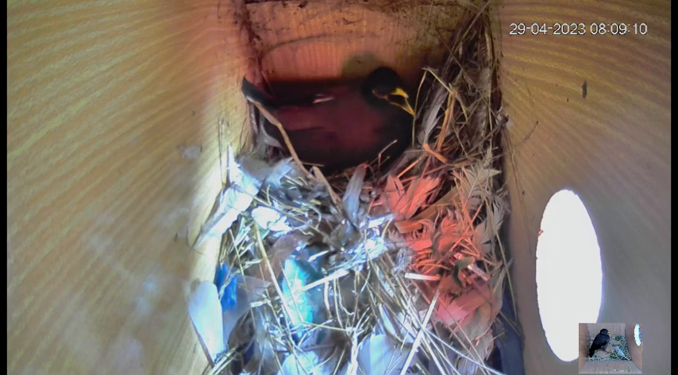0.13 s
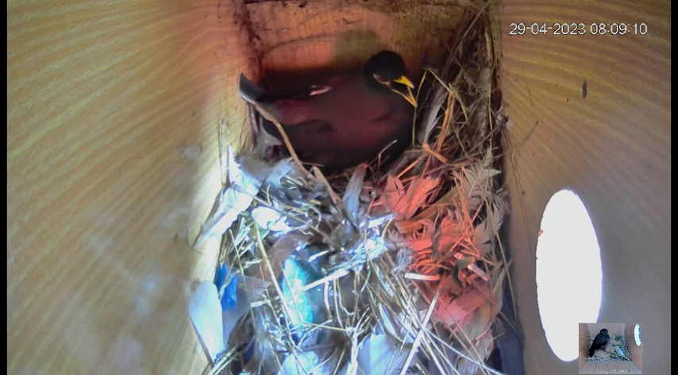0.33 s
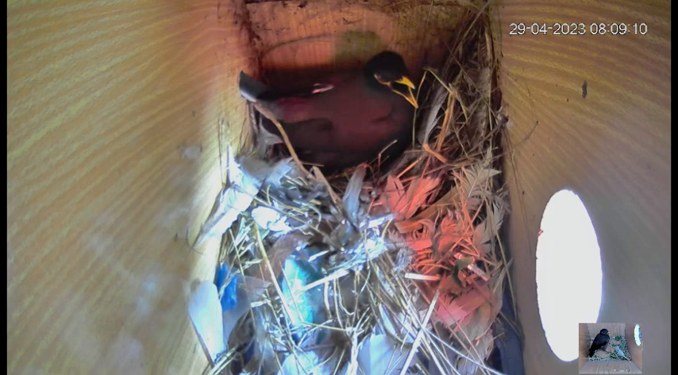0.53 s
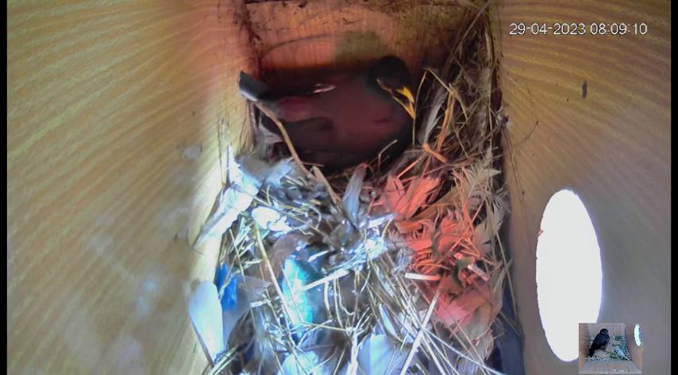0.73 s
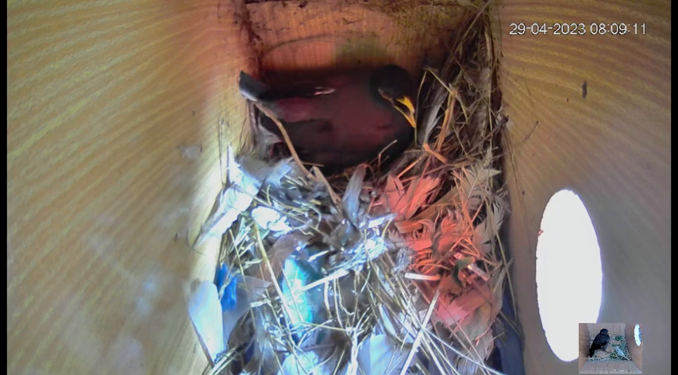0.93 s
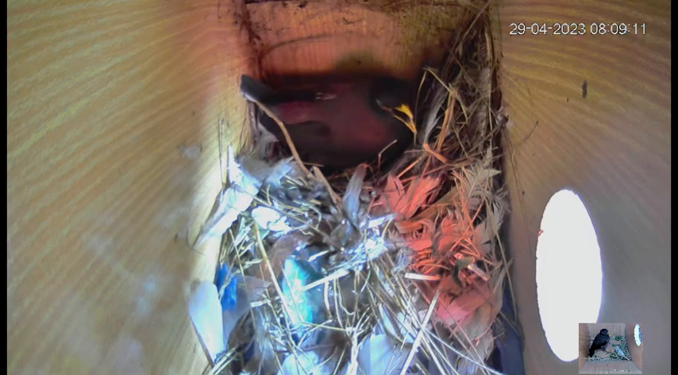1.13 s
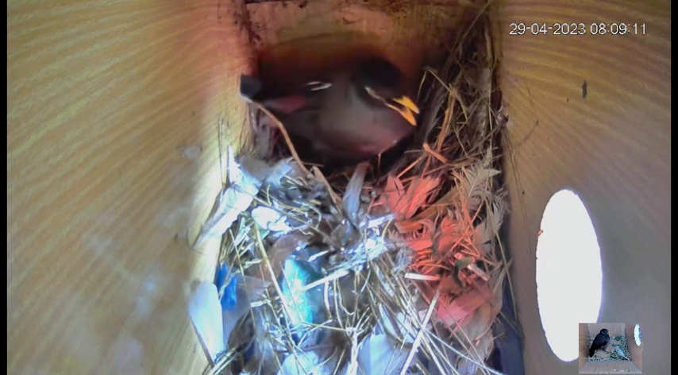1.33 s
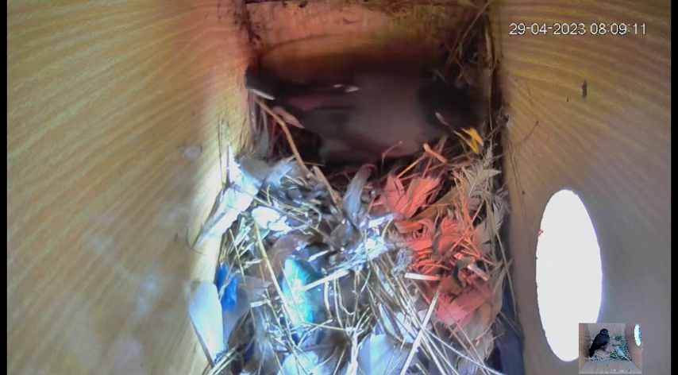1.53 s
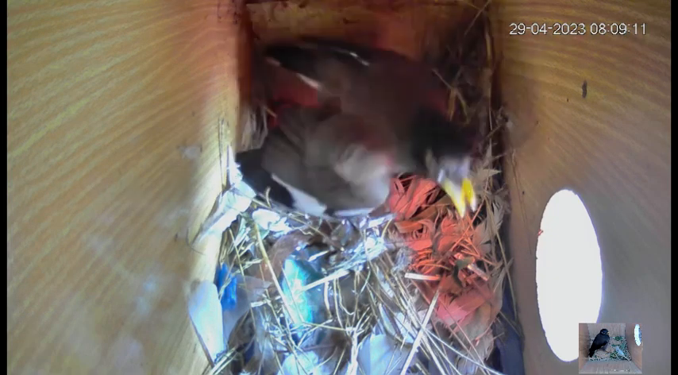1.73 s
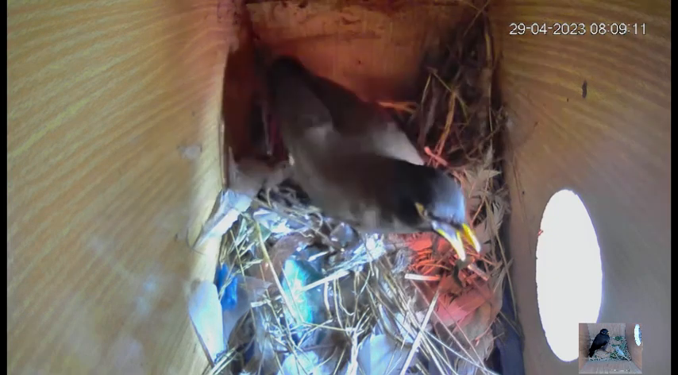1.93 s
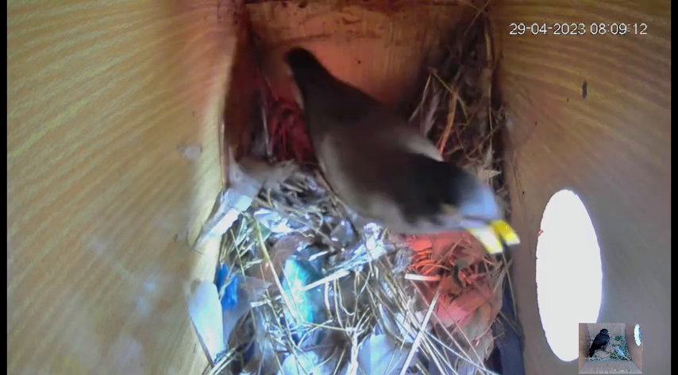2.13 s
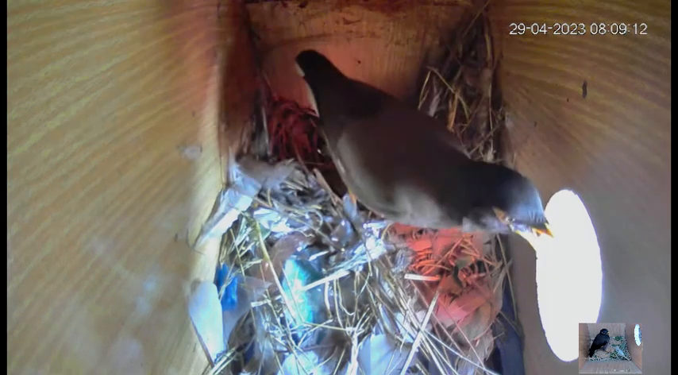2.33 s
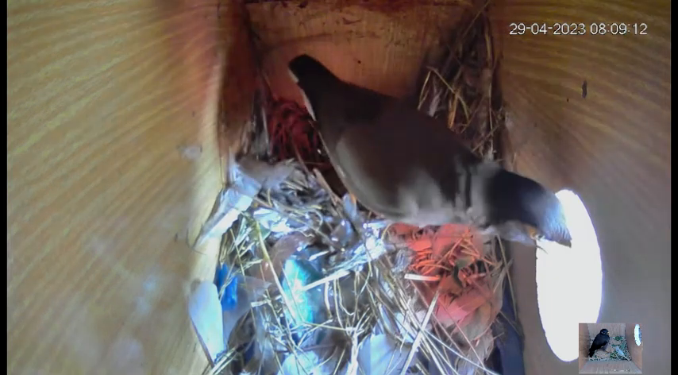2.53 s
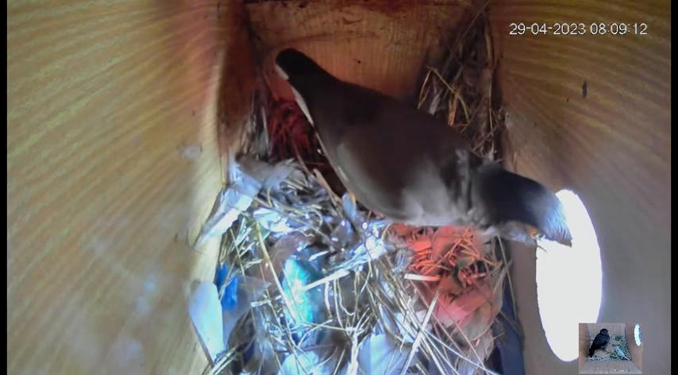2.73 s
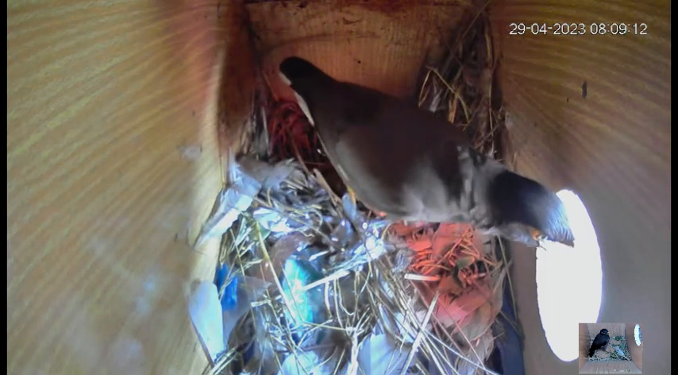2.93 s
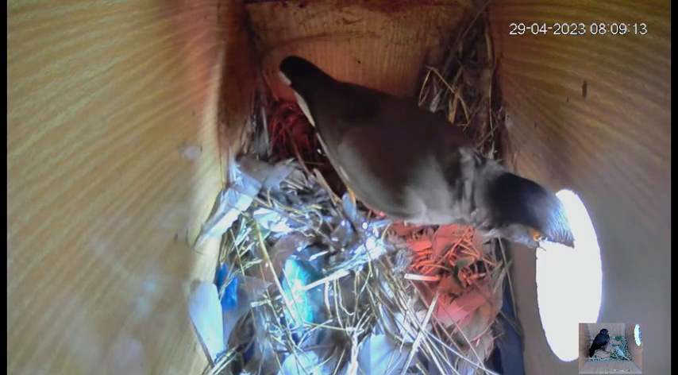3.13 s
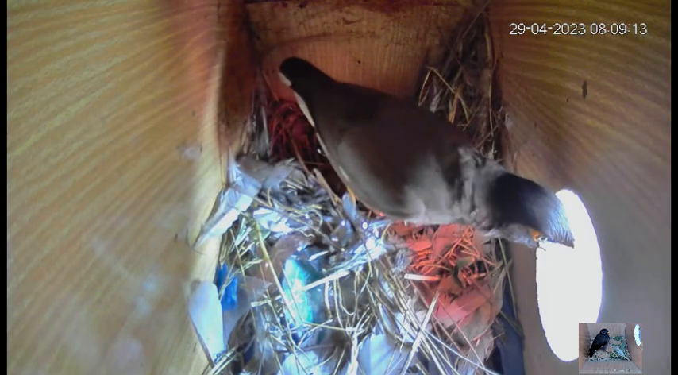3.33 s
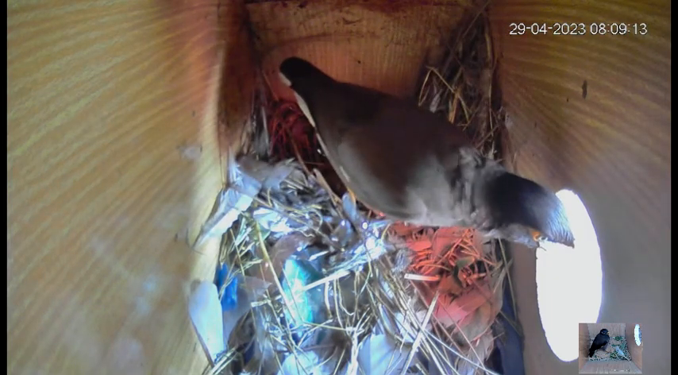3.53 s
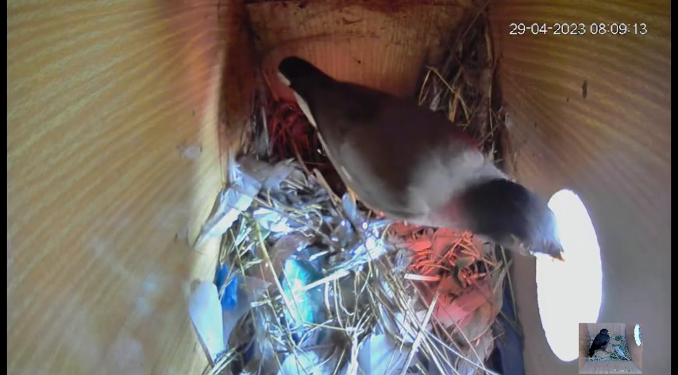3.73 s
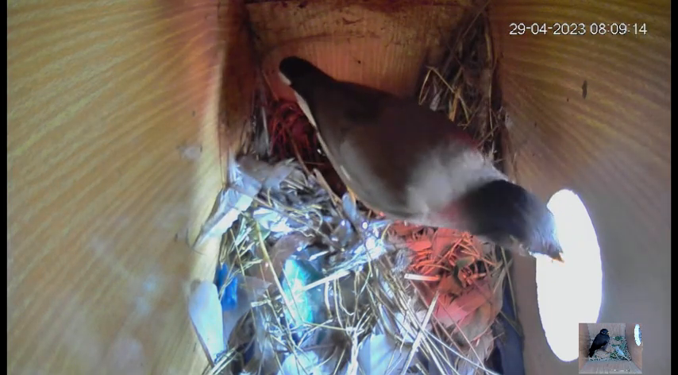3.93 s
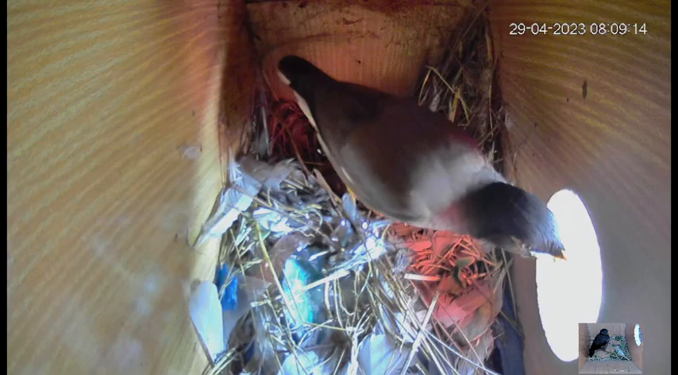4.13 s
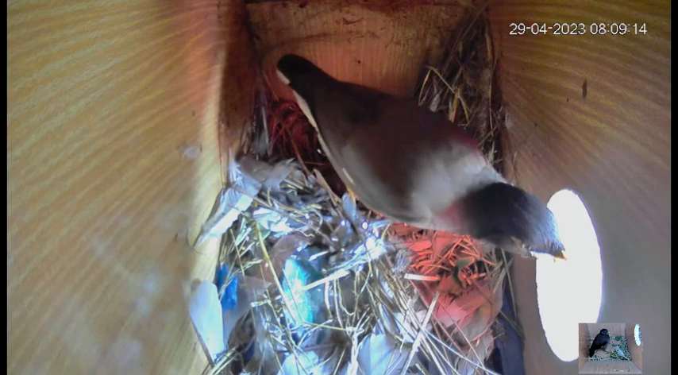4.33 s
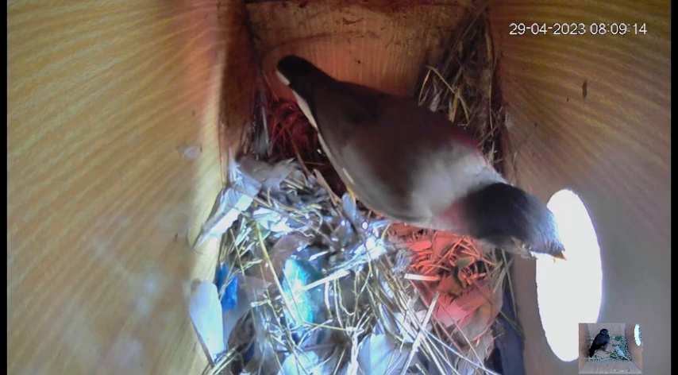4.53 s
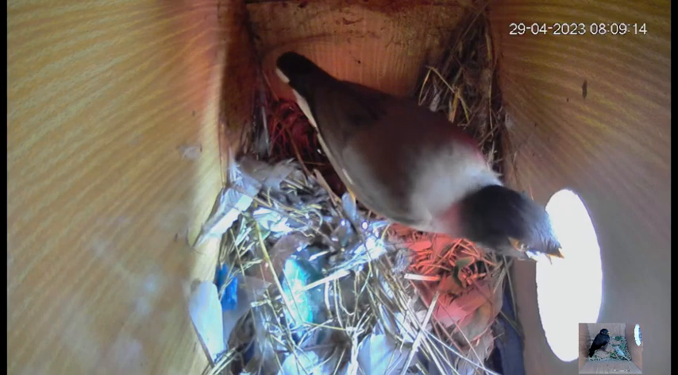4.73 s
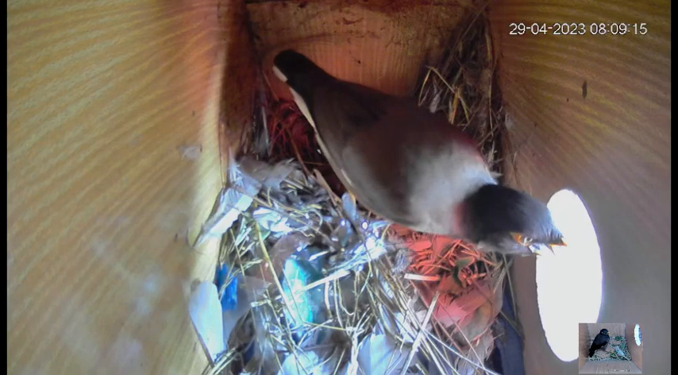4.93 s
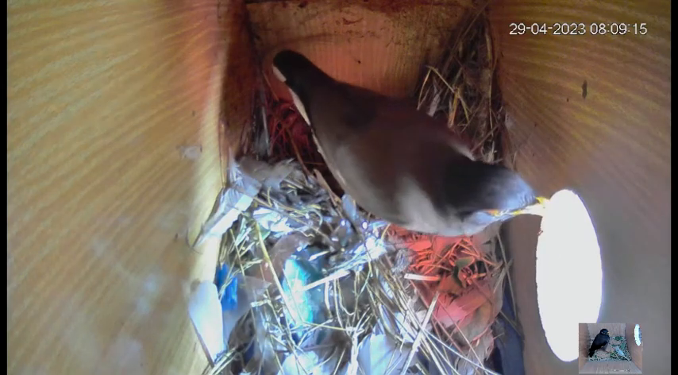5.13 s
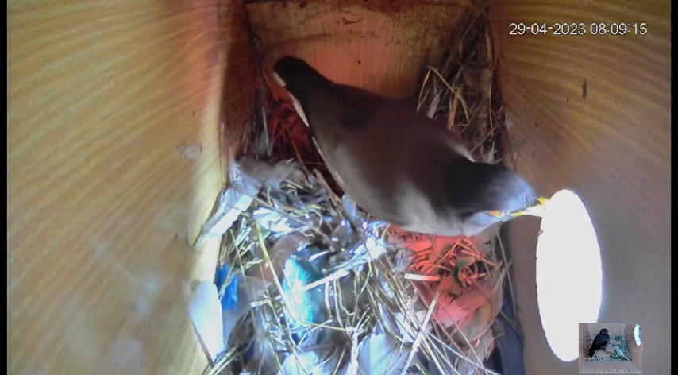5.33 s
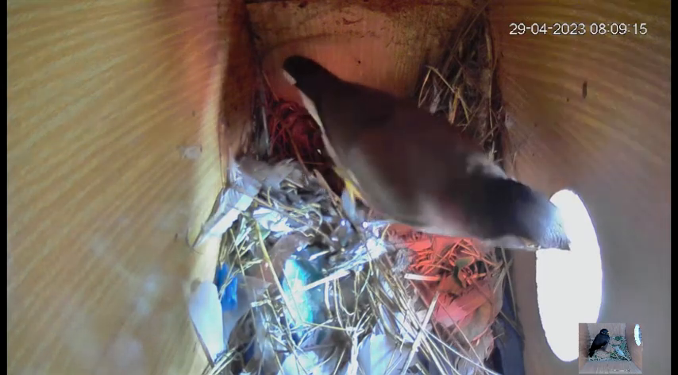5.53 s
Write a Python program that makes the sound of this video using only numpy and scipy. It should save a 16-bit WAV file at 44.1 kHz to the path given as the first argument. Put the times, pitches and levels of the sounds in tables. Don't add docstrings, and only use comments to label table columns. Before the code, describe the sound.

A bird in a wooden nest box ticks quietly, then scrambles through dry grass with sharp snaps, thumps and booms, before settling to near silence.

```python
import sys
import numpy as np
from scipy import signal
from scipy.fft import rfft, irfft
from scipy.io import wavfile
from scipy.ndimage import uniform_filter1d

SR = 44100
rng = np.random.default_rng(int(sys.argv[2]) if len(sys.argv) > 2 else 0)


def master_out(mix):
    frames = np.transpose(np.atleast_2d(mix))
    ceiling = np.clip(frames, -1, 1)
    pcm = np.round(ceiling * 32767).astype(np.int16)
    wavfile.write(sys.argv[1], SR, pcm)


def gain_from_db(level_db):
    decades = np.asarray(level_db, float) / 20
    return 10 ** decades


N = 250047


def evened(x):
    return x / np.sqrt(np.mean(x ** 2) + 1e-20)


def columns(rows, t):
    s, *rest = np.transpose(rows)
    return [np.interp(t, s, c) for c in rest]


def colour(x, points):
    f, db = np.transpose(points)
    hz = np.fft.rfftfreq(len(x), 1 / SR)
    gain = gain_from_db(np.interp(np.log(hz + 1), np.log(f + 1), db))
    return irfft(rfft(x) * gain, len(x))


def resonate(x, hz, width_hz):
    turn = np.exp(2j * np.pi * np.cumsum(hz * np.ones(len(x))) / SR)
    decay = np.exp(-np.pi * width_hz / SR)
    smooth = signal.lfilter([1 - decay], [1, -decay], x / turn + 1e-18)
    return 2 * (turn * smooth).real


def modes(x, table):
    return sum((-1) ** k * gain_from_db(db) * resonate(x, hz, width_hz)
               for k, (hz, width_hz, db) in enumerate(table))


def add(mix, s, sound):
    part = mix[round(s * SR):][:len(sound)]
    part += sound[:len(part)]


def steady(x, seconds, share):
    power = uniform_filter1d(x ** 2, round(seconds * SR)) + 1e-12
    return evened(x / power ** (share / 2))


def swells(s, db, fade_s, calm_db, rise=0.68):
    t = np.arange(0, N / SR + .01, .002)[:, None]
    late = (t - s) / np.maximum(fade_s, .02)
    swell = gain_from_db(db - 20 * np.maximum(late, -late / rise))
    power = (swell ** 2).sum(1) + gain_from_db(calm_db) ** 2
    return np.interp(np.arange(N) / SR, t[:, 0], np.sqrt(power))


def patchy(x, patch_db, flicker_db):
    z = signal.stft(x, nperseg=512, noverlap=384)[2]
    chance = rng.standard_normal(z.shape)
    patches = evened(uniform_filter1d(uniform_filter1d(chance, size=5, axis=0), size=12, axis=1))
    flicker = evened(uniform_filter1d(chance[0], size=5))
    z = z * gain_from_db(patch_db * patches + flicker_db * flicker)
    return evened(signal.istft(z, nperseg=512, noverlap=384)[1][:N])


# frequency in Hz, level in dB per Hz.
GRASS_SPECTRUM = [(530, -38), (900, -29), (1060, -11.5), (1350, -15), (1730, -5), (2240, -5.5),
                  (3510, -3.5), (4320, -1), (5350, -13.5), (6040, -8.5), (7050, -20.5), (9160, -48.5),
                  (15500, -120)]
# frequency in Hz, width in Hz, level in dB.
BOX_MODES = [(1375, 59, -5), (2170, 30, 1), (2430, 61, -7.5), (2880, 40, -12.5), (2930, 100, -3.5),
             (3606, 16, 3), (4170, 25, 4), (4510, 52, -0.5), (4700, 37, 3), (5650, 12, -4), (5240, 36, -4)]


def box(x, ring_db=-3.0):
    grass = evened(colour(x, GRASS_SPECTRUM))
    return evened(grass + gain_from_db(ring_db) * evened(modes(x, BOX_MODES)))


# frequency in Hz, width in Hz, level in dB.
WALL_MODES = [(477, 42, -1), (747.1, 48, 4.5), (981, 75, -7.5), (542, 300, -24)]


def walls(x):
    return modes(x, WALL_MODES)


# peak in seconds, stem crackle in dB,
# time to fade 20 dB in seconds, wall modes over crackle in dB.
MOVES = [(0.404, -58.5, 0.26, 8.5), (0.74, -88, 0, 32.5), (1.422, -75.5, 0.1, 17), (1.54, -61, 0.33, -16.5),
         (1.612, -49, 0.2755, 6.5), (1.683, -50, 0.2574, 13.5), (1.742, -33.5, 0.08, 10),
         (1.76, -40, 0.0432, 1), (1.815, -33, 0.0484, 4), (1.845, -36, 0.0611, 5.5),
         (1.868, -33.5, 0.0675, 4.5), (1.891, -33.5, 0.0562, 2), (1.922, -40, 0.0574, 10.5),
         (1.97, -29, 0.05, 5.5), (1.99, -46, 0.0854, -4), (2.029, -39, 0.08, -6), (2.059, -36, 0.0524, 5.5),
         (2.095, -33, 0.0508, 11.5), (2.165, -48.5, 0.1271, 5), (2.241, -79, 0.16, -21),
         (2.304, -49.5, 0.0777, 7), (2.361, -54.5, 0.19, -1), (2.39, -54.5, 0.15, 4.5),
         (2.419, -50.5, 0.0834, 6.5), (2.492, -59.5, -0.03, 16.5), (2.538, -63, -0.0443, 14.5),
         (2.701, -75, 1.45, 8.5), (2.802, -62.5, 0.15, 12.5), (2.859, -59, -0.1, 9), (3.251, -81, -1, -2),
         (3.52, -88, 0.5, 19.5), (5.348, -71, 0.06, 11), (5.479, -78.5, 0.63, -7.5), (5.67, -82, -1.8, 21)]


def rustle():
    rest_db, rest_walls_db = -86.5, 11
    slips_per_s, scrape_s = 700, 0.005
    s, crackle_db, fade_s, walls_db = np.transpose(MOVES)
    clumps = evened(uniform_filter1d(uniform_filter1d(rng.standard_normal(N), 500), 500))
    sizes = gain_from_db(6.1 * np.minimum(rng.exponential(1, N), 5))
    slips = sizes * (rng.random(N) < slips_per_s / SR)
    scrape = signal.lfilter([1], [1, -np.exp(-1 / (scrape_s * SR))], slips ** 2) ** .5
    drive = (evened(scrape) + 0.21) * gain_from_db(0.8 * clumps) * rng.standard_normal(N)
    panels = steady(modes(walls(drive), [(597.6, 1800, 0)]), 0.37, 0.46)
    stems = steady(patchy(box(drive), patch_db=5., flicker_db=1.), .018, .6)
    stem_gain = gain_from_db(2.0) * swells(s, crackle_db, fade_s, rest_db)
    wall_gain = gain_from_db(-15.5) * swells(s, crackle_db + walls_db, fade_s, rest_db + rest_walls_db)
    return stem_gain * stems + wall_gain * panels


# time in seconds, knock against each break in dB.
BEARING = [(0.3, -16), (0.41, -23.5), (0.9, -41.5), (1.1, -7.5), (1.39, -25.5), (1.48, -52.5), (1.6, -18),
           (1.73, -25.5), (1.86, -19), (2.29, -17), (2.44, -28), (2.6, -14.5), (2.78, -29.5), (3.3, -15.5),
           (3.65, -39.5), (5.3, -27), (5.65, -14)]


def breaks(table, press_db, ring_db, rise_s, crack_s, tail, tick, box_db, low_cut_db=0., width_hz=900):
    out, t = np.zeros(N), np.arange(-600, 4200) / SR
    age = np.maximum(t, 0)
    for s, db, hz, t60 in table:
        noise = rng.standard_normal((2, len(t)))
        crack = np.exp(-age / crack_s) + tail * gain_from_db(-60 * age / np.clip(t60, .01, .2))
        crack *= np.clip(1 + t / rise_s, 0, 1) ** 2
        burst = noise[0] * crack + tick * (t == 0)
        ring = evened(resonate(resonate(burst, hz, width_hz), hz, 1.45 * width_hz))
        stem = colour(box(burst, box_db), [(800, -low_cut_db), (3200, 0.002)]) + gain_from_db(ring_db) * ring
        knock = walls(noise[1] * crack)
        knock_gain = gain_from_db(columns(BEARING, s)[0] + press_db + 0.5)
        sound = stem / abs(stem).max() + knock_gain * knock / abs(knock).max()
        sound *= np.clip((t + rise_s + .002) / .002, 0, 1) * np.clip((t[-1] - t) / .03, 0, 1)
        add(out, s + t[0] + rise_s / 2, gain_from_db(db) * sound)
    return out


# time in seconds, peak in dB, stem
# pitch in Hz, t60 in seconds.
SNAPS = [(0.2897, -43.5, 4370, 0.29), (0.3425, -43.5, 3970, 0.28), (0.393, -42, 4140, 0.041),
         (0.407, -40, 3990, 0.058), (0.463, -40, 4320, 0.13), (0.8959, -44.5, 4070, 0.057),
         (1.3728, -36, 4620, 0.16), (1.3861, -33, 3140, 0.23), (1.451, -27, 4260, 0.09),
         (1.474, -16.5, 4400, 0.048), (1.5147, -21, 4170, 0.039), (1.5948, -44, 4300, 0.067),
         (1.7154, -24.5, 3210, 0.048), (1.7245, -17, 4280, 0.055), (1.7546, -19, 2200, 0.12),
         (1.7694, -26, 3910, 0.029), (1.8362, -9, 4300, 0.12), (1.8397, -8.5, 4417, 0.013),
         (1.8557, -20, 2400, 0.04), (2.1683, -23.5, 5600, 0.026), (2.2867, -35.5, 5230, 0.16),
         (2.4805, -33, 5910, 0.03), (2.5264, -37, 4560, 0.11), (2.7736, -24, 4340, 0.044),
         (5.2702, -52, 2897, 0.058), (5.3233, -43, 5970, 0.057),
         (5.16, -64, 5570, 0.059),
    (5.1862, -57.5, 4970, 0.042),
    (5.415, -54.5, 5650, 0.058),
         (0.476, -47.5, 4140, 0.033), (1.3665, -44.5, 4760, 0.041), (1.4385, -41, 4620, 0.046),
             (1.4792, -27.5, 4420, 0.029), (1.493, -38, 4230, 0.052), (1.5199, -30.5, 4130, 0.031),
             (1.5428, -39.5, 3400, .04), (1.789, -30.5, 4000, 0.066), (1.8164, -24.5, 4530, 0.025),
             (1.846, -15.5, 4040, 0.056), (1.8875, -23, 4048, .05), (1.923, -28.5, 4220, .03),
             (2.0251, -27.5, 4130, 0.19), (2.109, -35, 4330, 0.049), (2.194, -38, 4070, 0.022),
             (2.406, -37.5, 4080, 0.063), (2.436, -40.5, 6120, 0.022), (2.45, -36, 4320, 0.032),
             (2.548, -45, 4650, 0.045), (2.7781, -27, 4360, .04), (5.0967, -63, 5060, 0.041),
             (5.661, -51.5, 3770, 0.044), (5.6645, -44, 3840, 0.034)]
CRUNCHES = [
    (1.6045, -25, 3960, 0.041),
    (1.6871, -26, 3780, 0.054),
    (1.689, -28.5, 2330, 0.08),
    (1.8375, -19, 3086, 0.09),
    (1.8365, -22.5, 5882, 0.026),
    (1.9665, -21, 4460, 0.033),
    (2.1655, -23, 4010, 0.059),
    (5.3068, -46, 4140, 0.088),
    (5.6485, -36.5, 3700, 0.034),
    (5.6485, -44.5, 5920, 0.034),
]
TAPS = [
    (2.207, -40.5, 3950, 0.067),
    (2.528, -47, 3020, .04),
    (2.548, -54, 6700, 0.036),
    (3.6465, -37, 4400, .05),
    (3.648, -49.5, 3410, 0.04),
    (3.6625, -55.5, 4550, 0.034),
    (5.272, -51, 2858, .08),
    (5.309, -52.5, 2950, 0.12),
]
SCUFFS = [(0.1875, -52, 4290, 0.25), (0.5316, -47.5, 3960, 0.2), (1.0294, -61, 4230, 0.046),
          (1.1094, -61, 2700, 0.15), (1.3944, -29, 4400, 0.29), (1.417, -32.5, 3980, 0.14),
          (1.5718, -49, 3900, 0.073), (1.6472, -33, 4180, 0.12), (1.7, -28.5, 3830, 0.067),
          (1.7995, -19.5, 4030, 0.11), (1.8905, -29, 4170, 0.071), (1.9545, -22, 4500, 0.13),
          (2.056, -25, 4040, 0.063), (2.088, -30.5, 4220, 0.053), (2.149, -34.5, 4400, 0.041),
          (2.2062, -42, 4130, 0.048), (2.2252, -45.5, 4800, 0.1), (2.3144, -50, 4700, 0.24),
          (2.368, -40, 3960, 0.25), (2.296, -41, 4550, .15), (2.392, -37, 4000, .15),
          (2.4364, -32.5, 3000, 0.042), (2.559, -50, 3890, 0.038), (2.8057, -42, 4110, 0.21),
          (2.8492, -38, 4850, 0.19), (2.9767, -53, 2210, 0.11), (3.1659, -56, 4634, 0.085),
          (3.258, -59.5, 2170, 0.13), (4.076, -61, 4230, 0.073), (4.615, -57, 4130, .08),
          (5.3073, -42, 2910, 0.23), (5.35, -49.5, 796, 0.055)]


def snaps():
    sharp = breaks(SNAPS, press_db=0, ring_db=8, rise_s=.001, crack_s=.0014,
                   tail=.33, tick=3., box_db=-2., low_cut_db=14.)
    crunch = breaks(CRUNCHES, press_db=0, ring_db=8, rise_s=.002, crack_s=.003,
                    tail=.5, tick=.3, box_db=0., low_cut_db=10.)
    taps = breaks(TAPS, press_db=0, ring_db=12.5, rise_s=.002, crack_s=.002,
                  tail=.4, tick=1., box_db=0., width_hz=290)
    scuffs = breaks(SCUFFS, press_db=6.5, ring_db=1.5, rise_s=.012, crack_s=.005,
                    tail=.8, tick=.1, box_db=1.)
    return taps + sharp + crunch + gain_from_db(-4) * scuffs


# time in seconds, thump in dB.
THUMPS = [(0.672, -59), (1.499, -57.5), (1.751, -47.5), (1.832, -43), (1.879, -45.5), (2.0, -43.5),
          (2.077, -48), (2.16, -57), (2.191, -52.5), (2.298, -47.5), (2.43, -58.5), (2.569, -54.5),
          (2.67, -57), (2.811, -53.5), (2.941, -49), (2.98, -53), (5.301, -67), (5.477, -59.5),
          (5.67, -50.5)]


def thumps():
    noise = colour(rng.standard_normal(N), [(110, -29.5), (170, 7.0), (220, -10), (280, -0.5),
                                            (370, -21.5), (600, -39.5)])
    s, db = np.transpose(THUMPS)
    return swells(s, db, fade_s=0.05, calm_db=-74.5) * steady(noise, 0.053, 0.84)


# peak in seconds, boom in dB, time to fade 20 dB in ms,
# pitch in Hz.
PUSHES = [(0.105, -51, 116, 99.08), (0.323, -44.5, 66, 90.42), (0.463, -45, 94.5, 90.53),
          (0.518, -46.5, 52, 103.2), (0.573, -46, 51, 106.9), (0.635, -42.5, 43, 104.1),
          (0.724, -48.5, 87, 105.7), (0.866, -48.5, 58, 90.07), (1.026, -47, 51, 114.2),
          (1.133, -51.5, 42, 100.8), (1.236, -48.5, 67, 107.5), (1.444, -45, 48, 101),
          (1.506, -41.5, 104, 90.16), (1.612, -49.5, 89, 98.07), (1.798, -44.5, 58.5, 103.3),
          (1.88, -39.5, 57, 110.3), (2.014, -27, 63, 99.27), (2.068, -24, 42.5, 99.62),
          (2.188, -41, 42.5, 104.3), (2.256, -45.5, 48.5, 109.6), (2.295, -36, 38, 106.2),
          (2.369, -45.5, 49, 106.2), (2.432, -44, 70.5, 97.96), (2.564, -38.5, 61, 108.4),
          (2.635, -45.5, 48.5, 100.9), (2.818, -35, 42, 103.4), (2.974, -30.5, 182.5, 95.78),
          (3.221, -44, 65, 101.9), (3.312, -47, 61, 104.9), (3.369, -49.5, 62, 93),
          (3.469, -55.5, 55, 94.75), (3.588, -51.5, 49.5, 113), (3.809, -45.5, 66, 99.7),
          (3.853, -49, 74, 96.24), (3.977, -48.5, 92, 95.65), (4.037, -53, 65, 107.7),
          (4.091, -48, 55.5, 98.06), (4.233, -49.5, 63, 116.9), (4.29, -42, 66, 114),
          (4.439, -48, 81, 108.8), (4.619, -40.5, 49.5, 103.3), (4.669, -51.5, 48, 111.5),
          (4.723, -48, 62.5, 128.5), (4.807, -47, 77.5, 117.7), (5.026, -50, 91.5, 117.7),
          (5.076, -50.5, 71, 105.8), (5.213, -44.5, 93.5, 117.4), (5.418, -47, 75, 107.4),
          (5.487, -45.5, 48.5, 102.7), (5.556, -51, 66, 105.9)]
EXTRA_PUSH = [
    (2.935, -33, 110, 99.86),
]


def boom(t):
    rows = sorted(list(map(tuple, PUSHES)) + list(map(tuple, EXTRA_PUSH)))
    s, db, fade_ms, pitch_hz = np.transpose(rows)
    fade_s = np.minimum(fade_ms, np.where(db > -36, 63, 150)) / 1000
    push = swells(s, db, fade_s, calm_db=-59.5, rise=0.65)
    hz = np.interp(t, s, pitch_hz)
    ring = np.sqrt(2) * np.sin(2 * np.pi * np.cumsum(hz) / SR)
    gusts = evened(resonate(resonate(rng.standard_normal(N), hz, 54), hz, 42))
    share = np.clip((20 * np.log10(push) + 57) / 10, .03, .97)
    return push * (np.sqrt(share) * ring + np.sqrt(1 - share) * steady(gusts, .08, .05))


# time in seconds, rumble in dB.
GUSTS = [(0.0, -56.5), (0.19, -63), (0.349, -51), (0.82, -57), (1.229, -56), (1.75, -47.5), (1.881, -40.5),
         (2.009, -39.5), (2.13, -47.5), (2.56, -44.5), (2.668, -47.5), (2.813, -48), (2.95, -44),
         (3.05, -51.5), (3.599, -52), (3.771, -49), (4.629, -56.5), (5.041, -60), (5.301, -48.5),
         (5.67, -46.5)]


def wind():
    noise = colour(rng.standard_normal(N), [(8, -34.0), (20, -6.5), (48, 3.5), (70, 6.0), (200, -49.5)])
    s, db = np.transpose(GUSTS)
    return swells(s, db, fade_s=0.13, calm_db=-61.5) * steady(noise, 0.03, 0.31)


def note(rows, partials_db, rough=.0):
    t = np.arange(rows[0][0], rows[-1][0], 1 / SR)
    hz, db = columns(rows, t)
    wobble = evened(uniform_filter1d(rng.standard_normal(len(t)), 150))
    turns = np.cumsum(hz * (1 + rough * wobble)) / SR
    tone = sum(gain_from_db(p) * np.sin(2 * np.pi * (k + 1) * turns) for k, p in enumerate(partials_db))
    return rows[0][0], np.sqrt(2) * gain_from_db(db) * tone * signal.windows.tukey(len(t), .15)


# start in seconds, length in seconds, pitch in Hz, level in dB.
HUMS = [(0.601, 0.049, 692, -67.5), (0.66, 0.037, 315, -56), (0.715, 0.096, 666, -73.5),
        (0.76, 0.11, 637, -72), (0.574, 0.059, 1360, -76.5), (0.677, 0.063, 1380, -77),
        (0.85, 0.023, 1354, -73), (1.71, 0.05, 489.4, -44.5), (1.825, 0.043, 488, -38),
        (1.874, 0.062, 504, -45.5), (1.83, 0.03, 268, -42.5), (1.833, .03, 404, -48),
        (1.817, 0.063, 735, -38), (1.945, 0.035, 504, -39.5), (1.952, 0.057, 726, -47),
        (2.089, 0.025, 718, -44), (2.154, 0.028, 775, -49), (2.289, .045, 759, -59),
        (2.357, 0.037, 740, -60.5), (2.452, 0.042, 724, -64), (2.511, .045, 729, -64.5),
        (2.768, 0.025, 764, -56), (2.806, 0.025, 750, -56.5), (3.358, 0.045, 1068, -75.5),
        (3.43, 0.1, 619, -72.5), (3.498, 0.038, 660, -63), (5.34, 0.03, 780, -63),
        (5.412, 0.092, 507.5, -67.5)]


def hums():
    out = np.zeros(N)
    for s, length, hz, db in HUMS:
        curve = [(s, hz, db - 8), (s + length / 2, hz, db), (s + length, hz, db - 8)]
        add(out, *note(curve, [0], rough=.02))
    return out


# time in seconds, centre in Hz, level in dB.
RASP = [
    (5.23, 3650, -83),
    (5.26, 3880, -64),
    (5.30, 4240, -62.5),
    (5.335, 4700, -54.5),
    (5.35, 4700, -70),
]


def rasp():
    t = np.arange(RASP[0][0], RASP[-1][0], 1 / SR)
    hz, db = columns(RASP, t)
    noise = rng.standard_normal(len(t))

    def throat(centre_hz, width_hz):
        return evened(resonate(resonate(noise, centre_hz, width_hz), centre_hz, width_hz))

    fixed = 0.7 * throat(2930, 200) + 0.7 * throat(3850, 150) + .5 * throat(5600, 700)
    return t[0], gain_from_db(db) * evened(throat(hz, 420) + fixed)


# time in seconds, pitch in Hz, level in dB.
CHIRPS = [
    [(3.377, 3800, -54), (3.385, 3880, -36), (3.391, 3800, -39), (3.397, 3500, -36), (3.405, 3460, -38),
     (3.413, 3800, -43)],
    [(3.415, 3880, -48), (3.4195, 3930, -29), (3.4225, 3800, -31), (3.426, 3520, -33), (3.432, 3470, -33),
     (3.436, 3450, -46)],
]
# frequency in Hz, width in Hz, level in dB.
CHIRP_HISS = [(2850, 100, 0), (4650, 200, -3)]
# time in seconds, pitch in Hz, level in dB.
WHISTLE = [
    (0.0, 3670, -75.5),
    (0.016, 3380, -68),
    (0.032, 3500, -86),
    (0.06, 3900, -67.5),
    (0.09, 3850, -90.5),
    (0.16, 4030, -110),
]
# time in seconds, pitch in Hz, level of the third partial in dB.
SQUEAL = [
    (5.35, 1016, -72),
    (5.388, 1035, -58),
    (5.405, 1055, -72),
    (5.42, 1068, -62),
    (5.432, 1090, -69),
    (5.448, 1118, -55),
    (5.48, 1195, -72),
    (5.502, 1200, -62),
    (5.52, 1200, -80),
]
SQUEAL_PARTIALS_DB = [-24, -30, 0]
SQUEAL_TOP_DB = [-99, -16, -99, -6, -14, -9]


def birds():
    near, far = np.zeros(N), np.zeros(N)
    for rows in CHIRPS:
        add(near, *note(rows, [-1, -37], rough=.011))
    loudness = np.sqrt(abs(uniform_filter1d(near ** 2, size=200)))
    hiss = loudness * (np.arange(N) > CHIRPS[0][3][0] * SR) * rng.standard_normal(N)
    near = near + gain_from_db(-19) * modes(modes(hiss, CHIRP_HISS), CHIRP_HISS) * 4
    add(far, *note(WHISTLE, [0], rough=.035))
    add(far, *note(SQUEAL, SQUEAL_PARTIALS_DB, rough=.013))
    add(far, *note(SQUEAL[:6], SQUEAL_TOP_DB[:4], rough=.028))
    add(far, *note(SQUEAL[:4], [-99] * 4 + list(SQUEAL_TOP_DB[4:]), rough=.016))
    add(far, *rasp())
    yard_db, yard_t60_s = -5.5, .3
    t = np.arange(SR // 2) / SR
    echoes = rng.standard_normal(len(t)) * (rng.random(len(t)) < .3)
    echoes *= gain_from_db(-60 * t / yard_t60_s) * (t > .004)
    tail = signal.fftconvolve(near + .5 * far, echoes / np.linalg.norm(echoes))[:N]
    return near + far + gain_from_db(yard_db) * tail


# frequency in Hz, level in dB per Hz.
HUSH_SPECTRUM = [(210, -38.5), (350, -12), (423, -10), (491, 4.5), (543, -7), (725, -3.5), (802, -29),
                 (1080, -9), (1210, -20), (2010, -17), (2450, -27.5), (3000, -23), (3710, -11.5),
                 (4270, -15), (5600, -20), (7050, -32), (9160, -55), (15500, -120)]
# frequency in Hz, width in Hz, level in dB.
THROB_BANDS = [(1970, 510, -3.5), (4130, 160, -0.5), (4530, 83, -1), (4970, 27, -5)]


def hush(t):
    hush_db, throb_db = -77, -82.5
    throb_per_s, throb_peak_s = 9.71, 3.8
    beat = np.cos(2 * np.pi * throb_per_s * (t - throb_peak_s))
    noise = colour(rng.standard_normal(N), HUSH_SPECTRUM)
    wash = gain_from_db(hush_db) * patchy(noise, patch_db=4.5, flicker_db=1.8)
    low = signal.sosfiltfilt(signal.butter(2, 1200, fs=SR, output="sos"), wash)
    bands = modes(modes(rng.standard_normal(N), THROB_BANDS), THROB_BANDS)
    throb = patchy(bands, patch_db=5.5, flicker_db=2.0)
    return low + gain_from_db(2.5 * beat - 3.0) * (wash - low) + gain_from_db(throb_db + 7 * beat) * throb


def scene():
    t = np.arange(N) / SR
    return (rustle() + snaps() + thumps() + boom(t) + wind() + hums() + birds() + hush(t))[None]


# start in seconds, length in seconds,
# step raised by dB.
SHORTAGES = [(1.31, .045, 25.5), (2.122, .03, 24), (2.194, .02, 31), (2.252, .032, 19.5), (2.575, .04, 17),
             (2.728, 0.048, 25), (2.889, .03, 23), (3.018, .03, 10.5), (3.105, .05, 2.5), (3.223, .03, 7.5),
             (3.343, .03, -4), (3.615, .03, 20)]


def starve(x):
    below_db, lowest_db, memory_db_per_s = -38.5, -110., 10.5
    spread_db, coarse_db = 6.5, -7.
    frame, grid = 706, 441
    lead = frame - grid
    frames = dict(fs=SR, nperseg=2 * frame, noverlap=frame, window="cosine")
    hz, t, z = signal.stft(np.pad(x, (lead, 0)), **frames)
    t = t - lead / SR
    band = (np.log(1 + hz / 1500) * 12).astype(int)
    power = np.array([np.bincount(band, c) for c in abs(z.T) ** 2]).T / np.bincount(band)[:, None]
    number = np.arange(len(power))[:, None]
    loud_db = 10 * np.log10((abs(z[(hz > 1500) & (hz < 7000)]) ** 2).mean(0) + 1e-20)
    memory_db = np.maximum.accumulate(loud_db + memory_db_per_s * t) - memory_db_per_s * t
    bar_db = np.maximum(memory_db + below_db, lowest_db)
    short_db = sum(db * ((t > s) & (t < s + length)) for s, length, db in SHORTAGES)
    bar_db = bar_db + short_db * (1.3 - number / 35)
    least = gain_from_db(bar_db + spread_db * rng.standard_normal(power.shape) - 0.12 * number)
    step = np.maximum(least, gain_from_db(coarse_db) * np.sqrt(power))[band] * 2
    step = np.where(hz[:, None] < 400, step / 30, step)
    error = signal.istft(step * np.round(z / step), **frames)[1][lead:][:N] - x

    def treble(v):
        return abs(uniform_filter1d(np.gradient(np.gradient(v)) ** 2, size=260)) + 1e-20

    return x + error * np.minimum(1, np.sqrt(3 * treble(x) / treble(error)))


def low_pass(x):
    return signal.sosfilt(signal.butter(12, 9150, fs=SR, output="sos"), x)


def record(dry):
    camera_rate_hz, mirror_db = 16000, -26
    edge = signal.firwin(601, 7220, window=("kaiser", 7), fs=SR)
    x = signal.oaconvolve(starve(dry[0]), edge, "same")
    mirror = 2 * x * np.cos(2 * np.pi * camera_rate_hz * np.arange(N) / SR)
    mirror = colour(mirror, [(8500, -90), (8750, 0), (8850, 0), (9300, -25), (10000, -90)])
    mix = x + gain_from_db(mirror_db) * mirror
    return low_pass(mix[None])


dry = scene()
out = record(dry)
master_out(out)
```